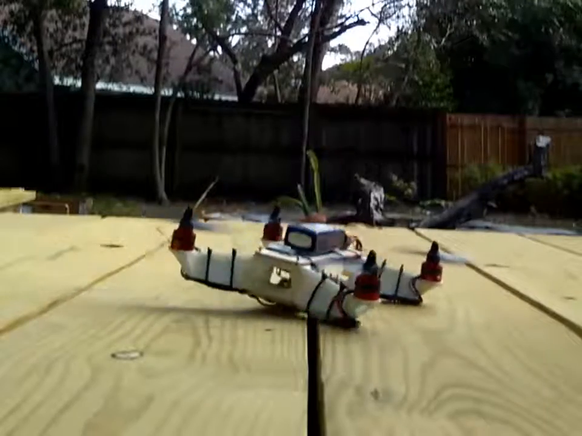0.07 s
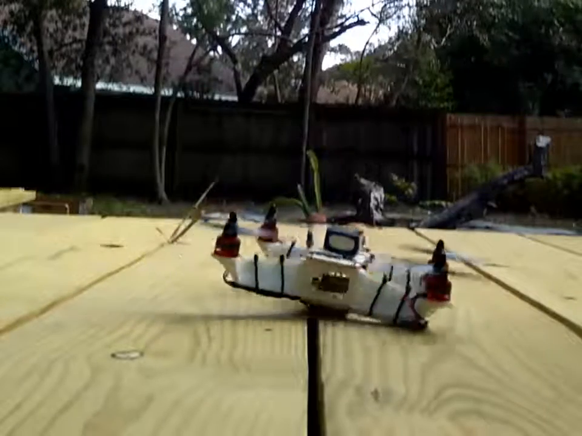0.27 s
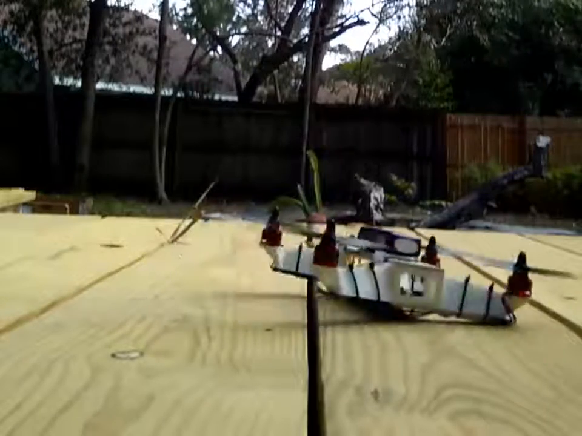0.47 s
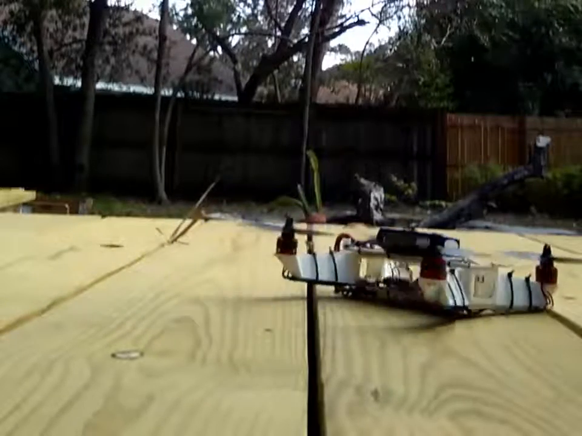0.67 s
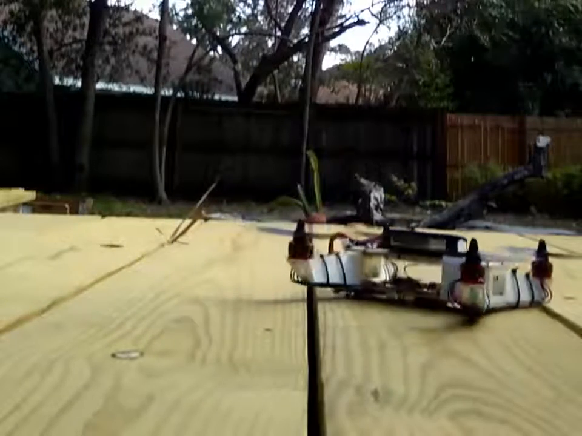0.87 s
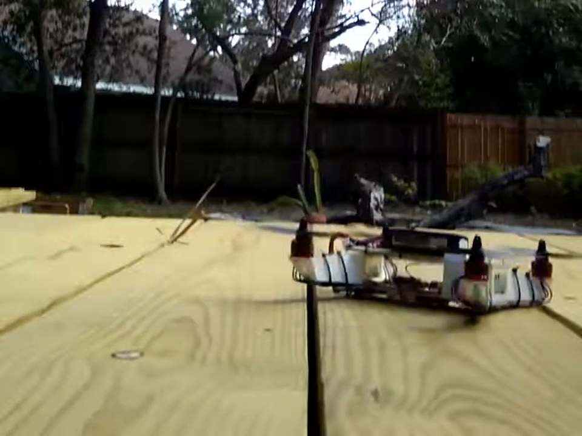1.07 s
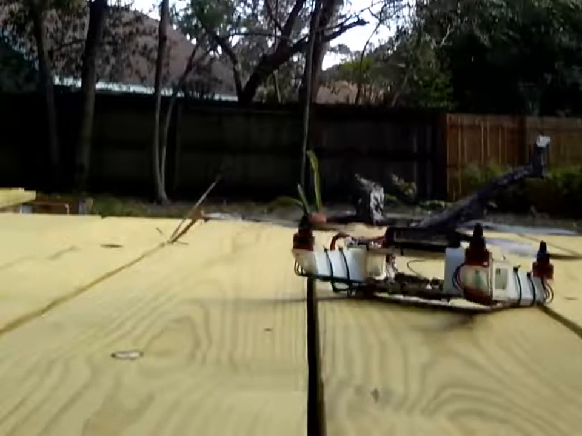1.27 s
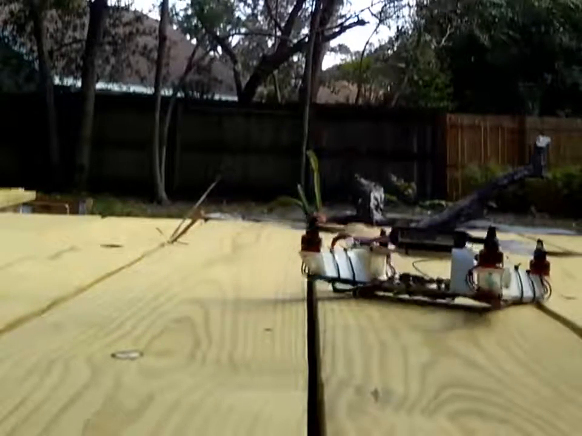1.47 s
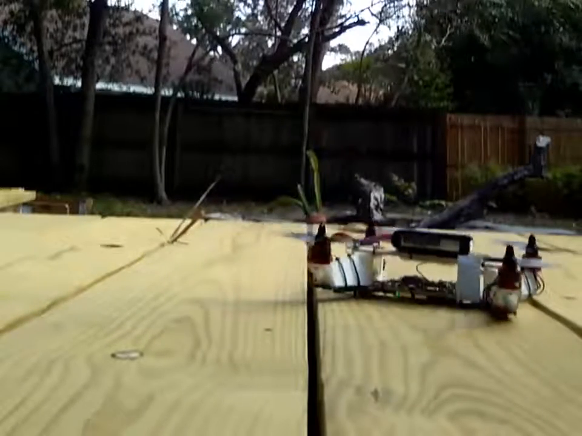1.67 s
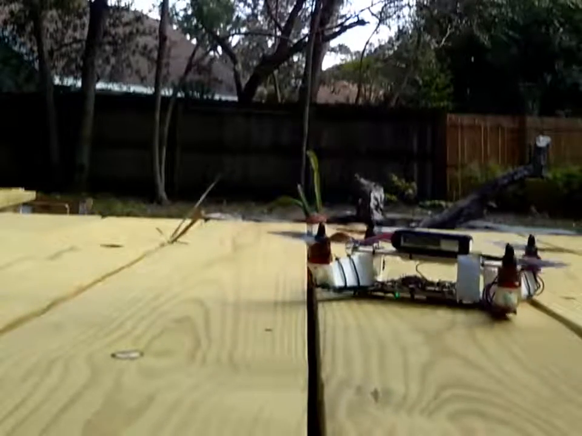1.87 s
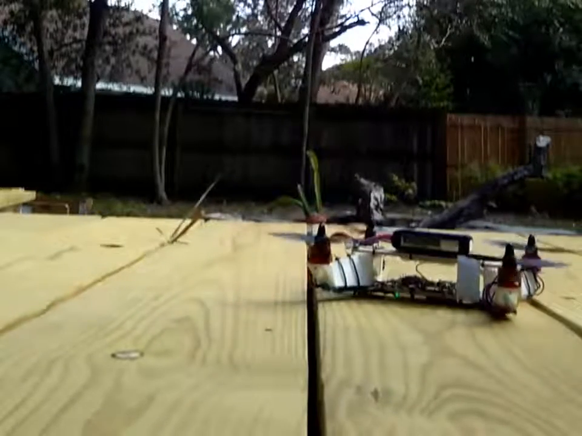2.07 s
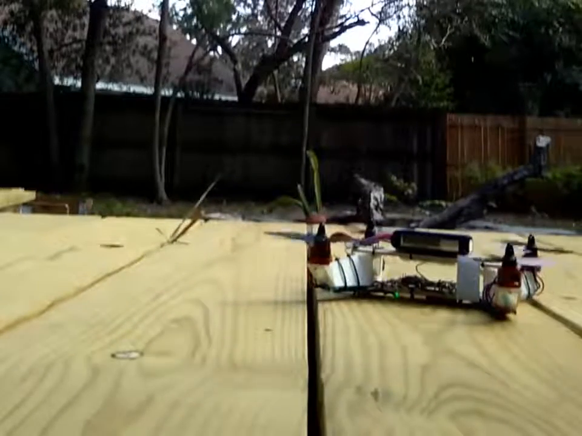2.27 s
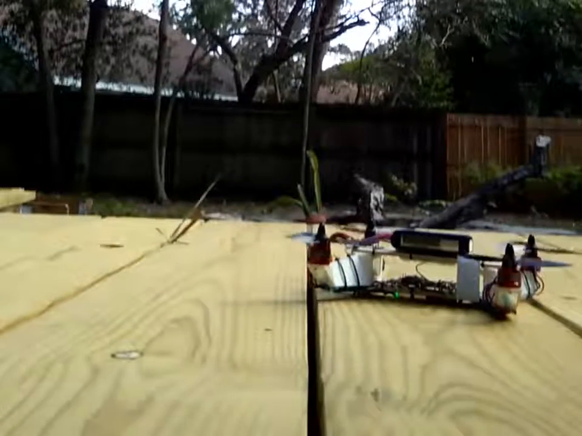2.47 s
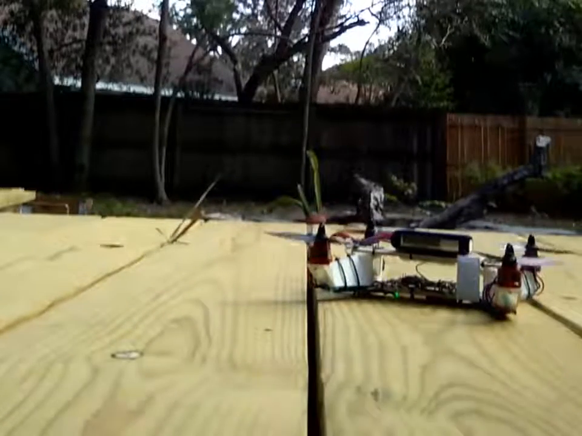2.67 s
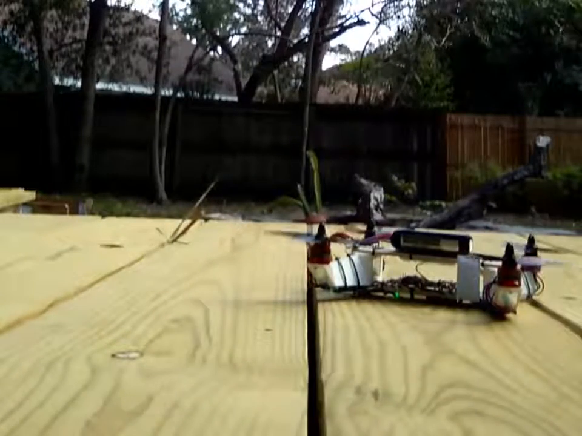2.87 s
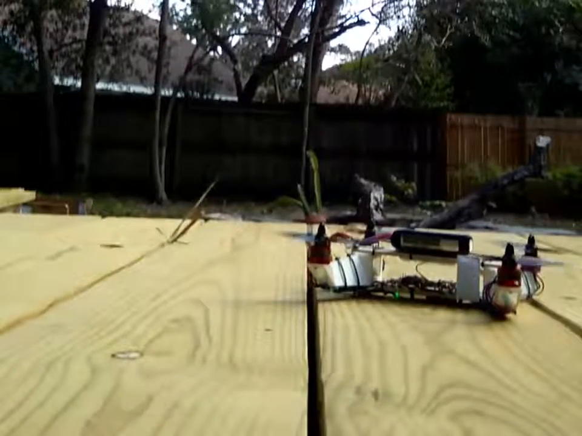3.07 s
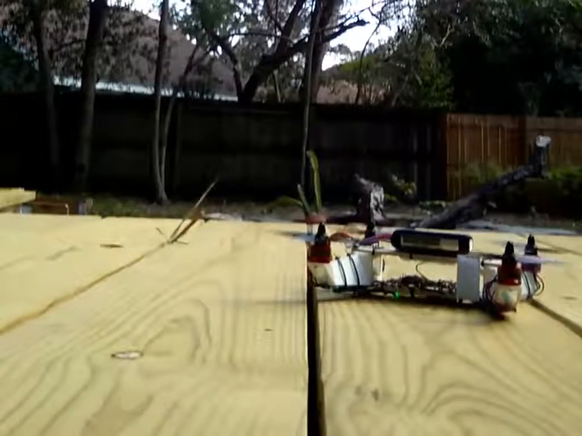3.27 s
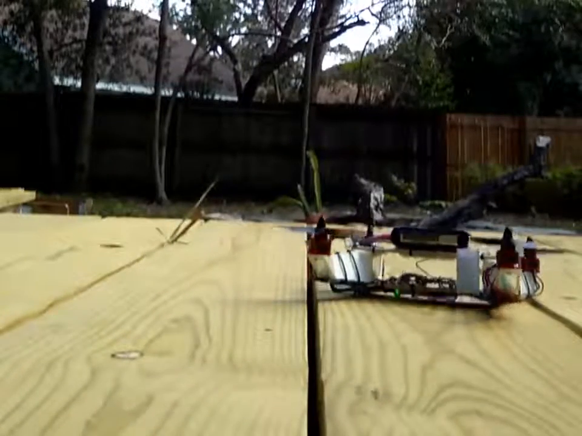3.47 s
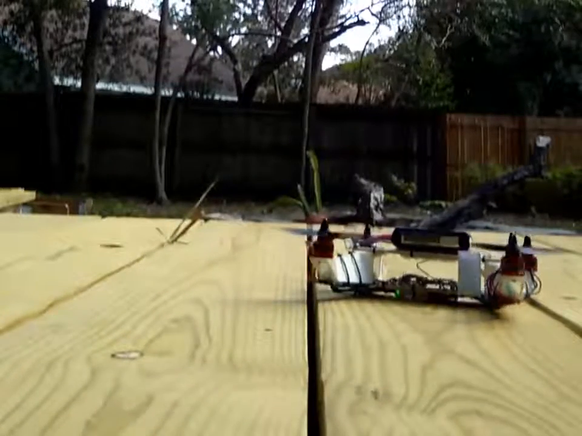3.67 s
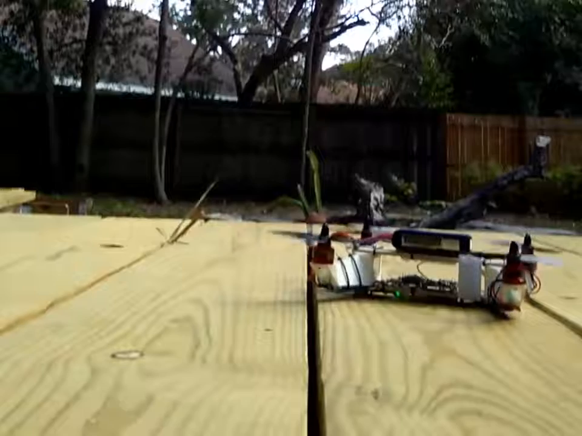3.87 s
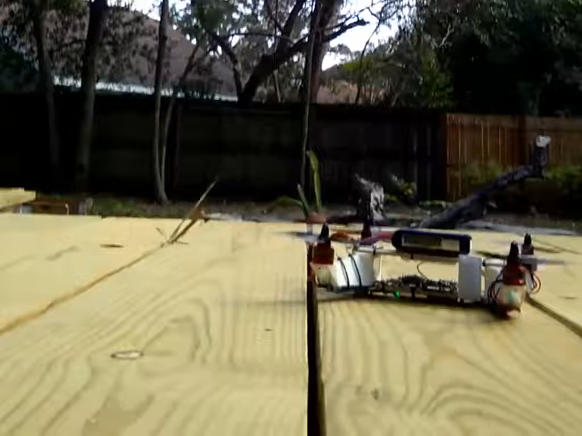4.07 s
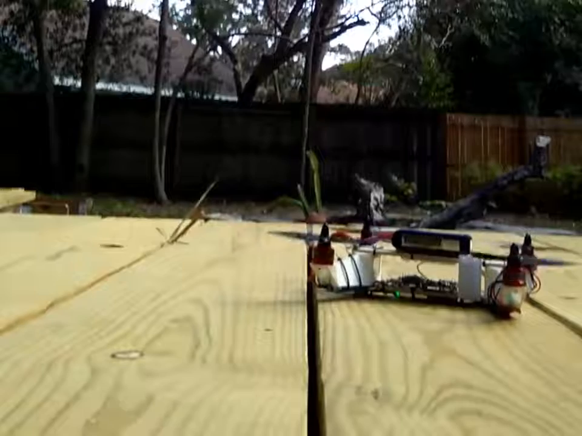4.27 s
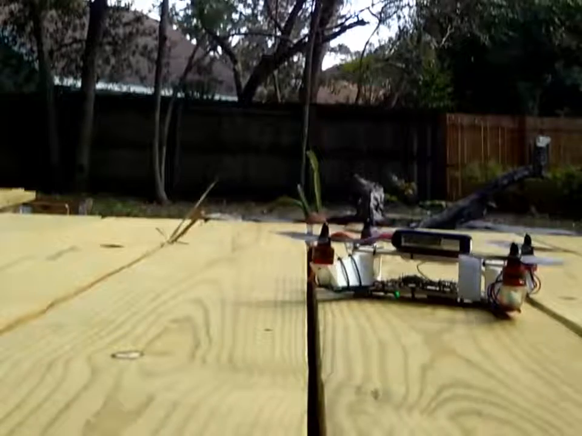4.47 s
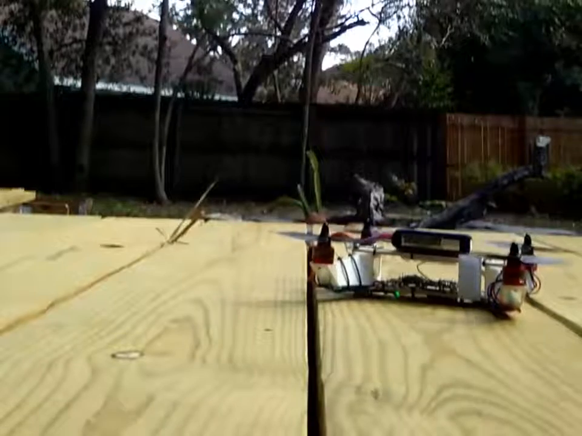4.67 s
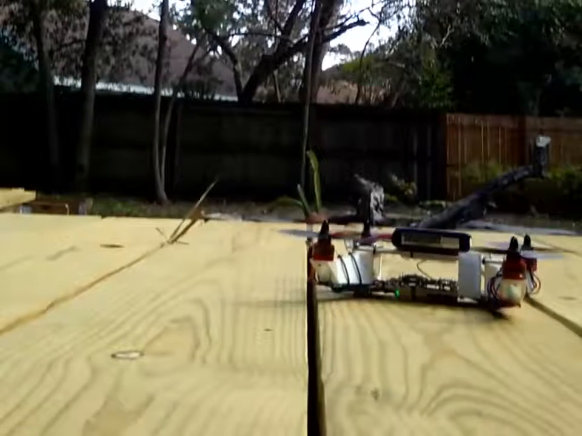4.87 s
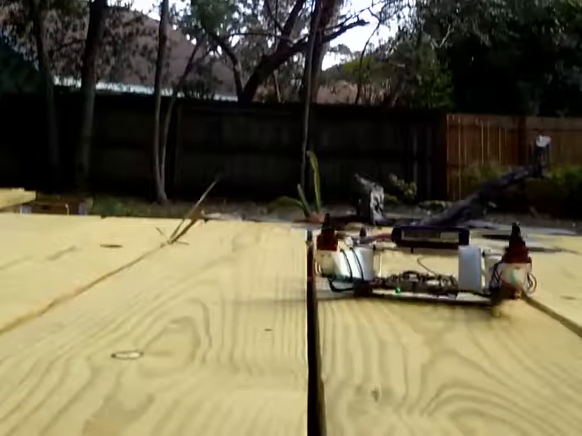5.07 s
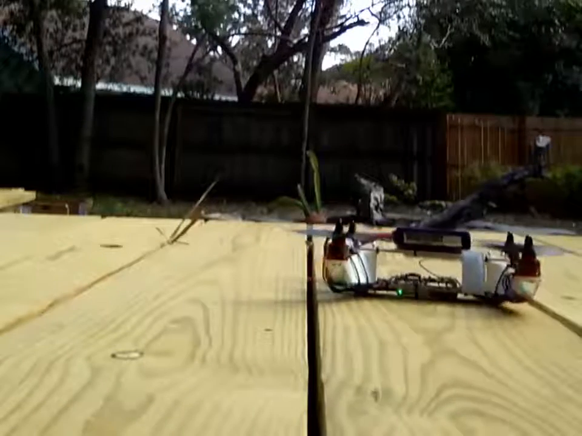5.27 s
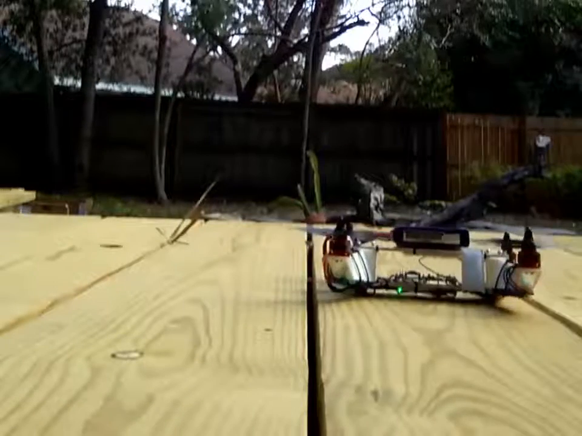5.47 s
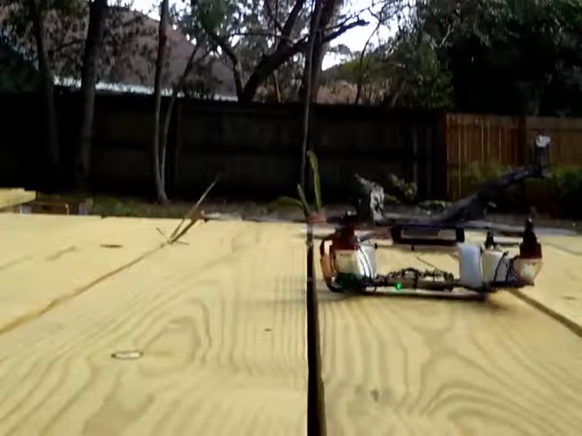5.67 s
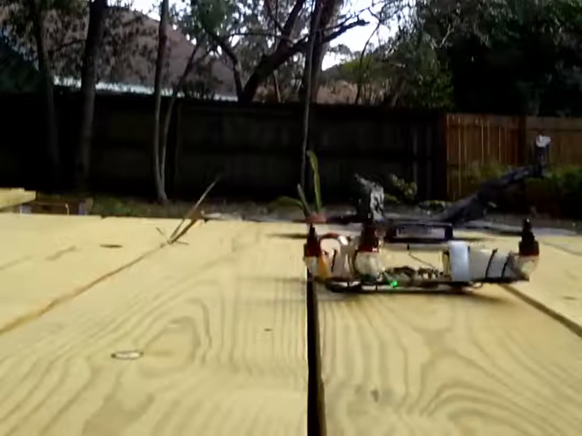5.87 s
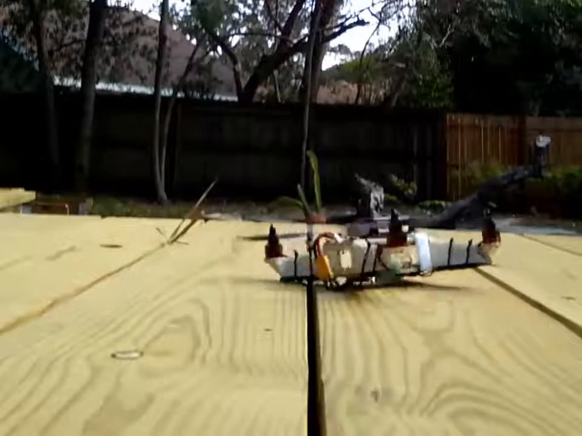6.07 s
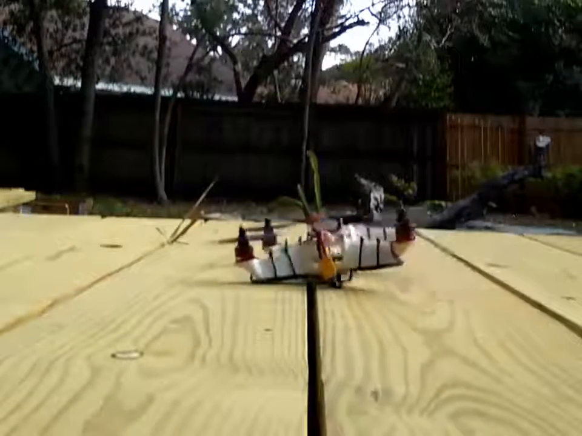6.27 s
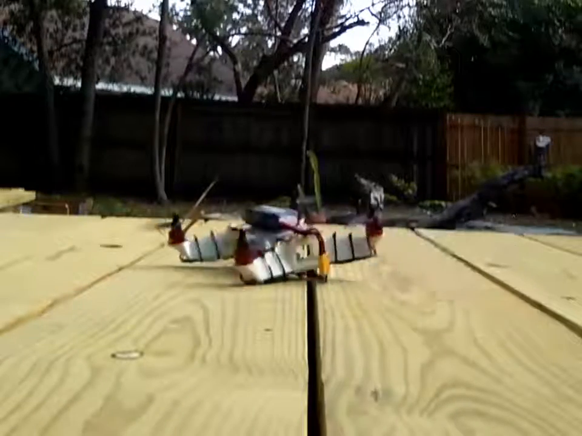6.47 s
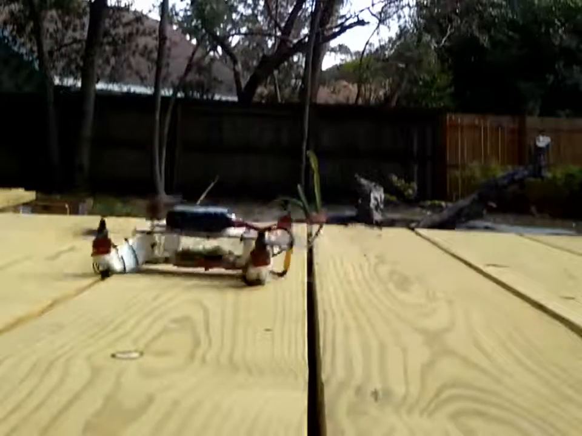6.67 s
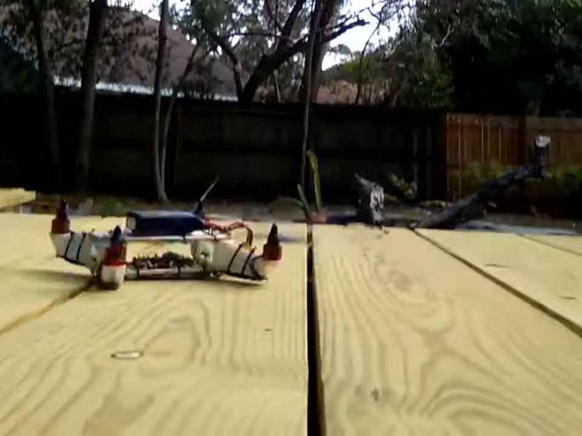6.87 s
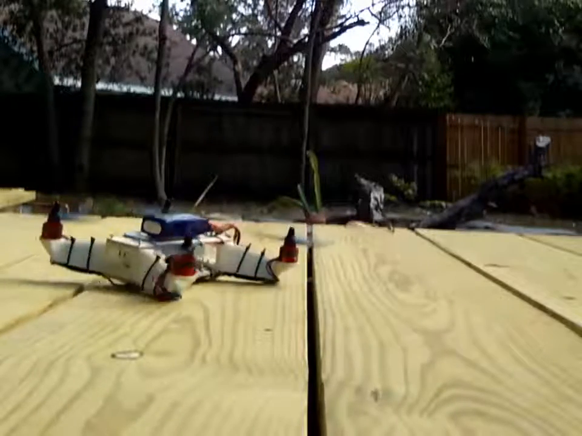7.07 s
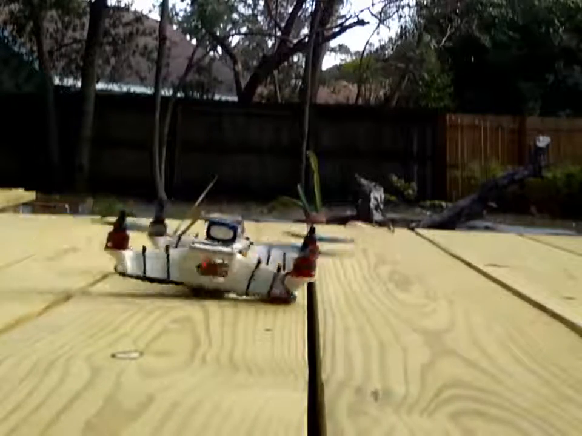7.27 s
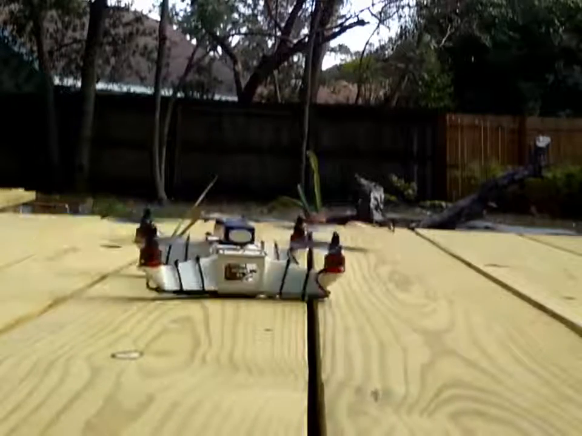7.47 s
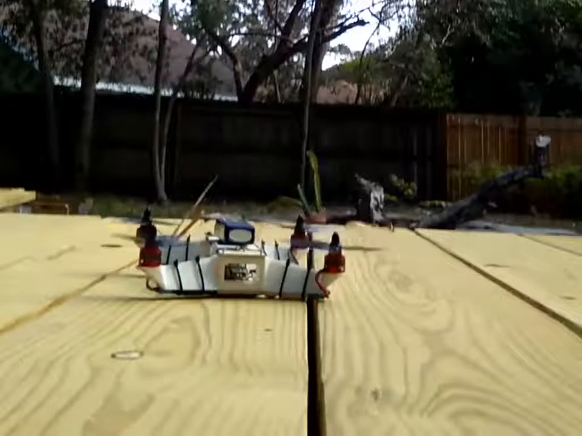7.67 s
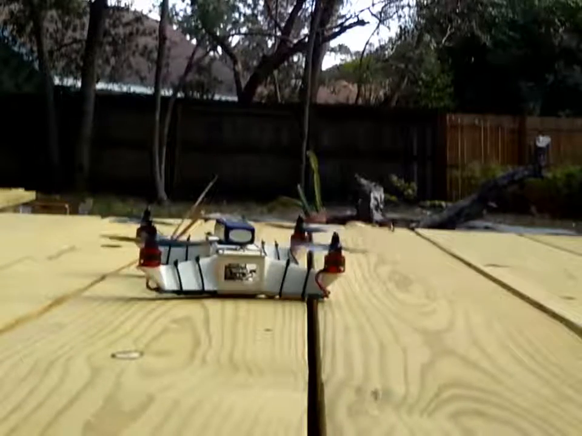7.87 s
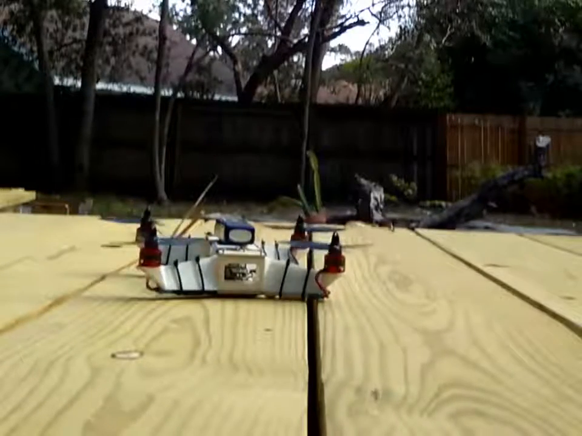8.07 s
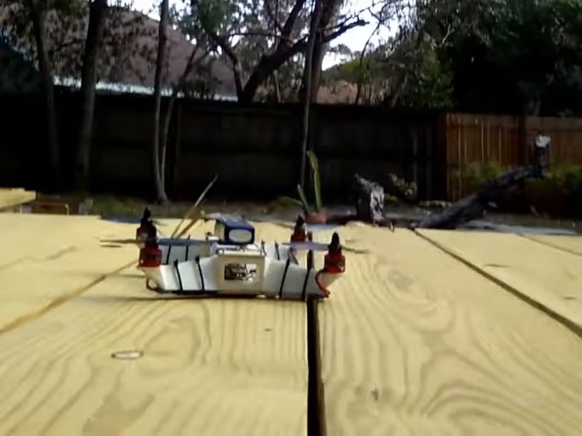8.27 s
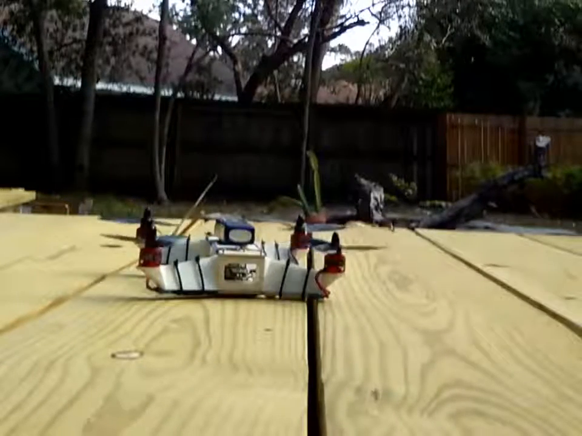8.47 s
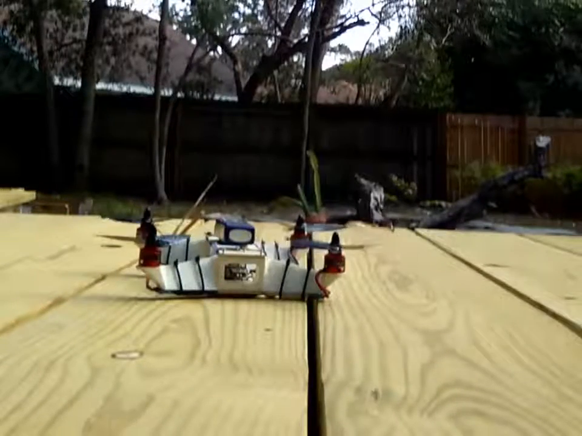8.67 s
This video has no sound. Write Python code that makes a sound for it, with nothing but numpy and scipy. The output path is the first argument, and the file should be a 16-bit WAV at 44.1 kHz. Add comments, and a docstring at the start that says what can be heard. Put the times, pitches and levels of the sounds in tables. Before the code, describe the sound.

Four small propellers give a rough, beating hum with bright airy hiss and thin motor whine. They run down, leaving a far-off engine and faint dry scuffs, then squeal sharply into a brief rev. After another slowdown the longest burst rises in pitch; downwash buffets the nearby microphone hard and briefly dulls its level. Finally the motors whistle down, with small low wind bumps in the garden.

```python
"""Four three-blade propellers hum and hiss close to a stereo camera: a small homemade quadcopter skids on a deck.
It has three bursts of throttle. Blade-pass tones and pulsing noise make the propellers; pole and switching tones
make the motors, which whine under power, whistle as they run down and squeal on starting from rest.
Downwash buffets the microphone with damped low swings and rumble, once so hard that the camera's gain ducks.
Behind the quiet noise of the garden an engine goes by far off, and a second, steadier drone swells later."""
import sys
import numpy as np
from scipy import signal
from scipy.fft import rfft, irfft
from scipy.io import wavfile
from scipy.ndimage import uniform_filter1d

SR = 44100
rng = np.random.default_rng(int(sys.argv[2]) if len(sys.argv) > 2 else 0)


def master_out(mix):
    """Clip the mix to full scale and print it as 16-bit PCM to the path in sys.argv[1]."""
    frames = np.transpose(np.atleast_2d(mix))
    ceiling = np.clip(frames, -1, 1)
    pcm = np.round(ceiling * 32767).astype(np.int16)
    wavfile.write(sys.argv[1], SR, pcm)


N = 384534
TIME = np.arange(N) / SR
FREQ = np.maximum(np.fft.rfftfreq(N, 1 / SR), 1)
PWM_HZ = 8020  # half the rate of the whine's switching lines, and the carrier of the squeal
POLES_PER_BLADE = 14 / 3  # motor poles per blade pass
CATCH_S = 2.907  # the motors catch
# bursts of throttle, powered from first point to last: t/s, reference blade-pass f/Hz, spread of rotor speeds/%
THROTTLE = [
    [(0, 394.3, 5.4), (.5, 396.3, 5.4), (.62, 354.3, 5.5), (.78, 326.7, 6.5), (1, 344.6, 7),
     (1.3, 367.5, 7), (1.45, 368.2, 7.3), (1.61, 332.2, 7)],
    [(2.715, 3, 5), (2.89, 160, 6), (2.95, 212, 7), (3.17, 222, 7), (3.36, 353, 7), (3.48, 357, 7.6),
     (3.63, 338, 7.5)],
    [(4.27, 64.8, 7), (4.45, 185.3, 7), (4.72, 264, 7), (4.9, 351, 7.6), (5.04, 371.2, 7.4), (5.27, 335, 6),
     (5.5, 379, 6.5), (5.68, 394.7, 6.6), (6.05, 399, 5.8), (6.3, 411.6, 6.6), (6.55, 419, 7.2),
     (6.85, 405.2, 6), (7.25, 403.8, 5.2)],
]
# the four rotors: offset from the reference speed/spreads, level of its hum/dB
ROTORS = [(-2, -15.5), (-1, 2), (-.25, 3), (1, 2)]


def undb(db):
    """Decibels to gain."""
    return 10 ** (np.asarray(db) / 20)


def curve(rows, axis=1):
    """One column of a table at every sample."""
    rows = np.asarray(rows, float)
    return np.interp(TIME, rows[:, 0], rows[:, axis])


def response(points):
    """Gain at every frequency from f/Hz, level/dB points."""
    hz, db = np.transpose(points)
    return undb(np.interp(np.log(FREQ), np.log(hz), db))


def colour(x, gain):
    """Filter by a gain at every frequency."""
    return irfft(rfft(x) * gain, N)


def unit(x):
    """Scale to rms 1."""
    return x / np.sqrt(np.mean(x ** 2))


def noise():
    """Two unrelated white noises, one a channel."""
    return rng.standard_normal((2, N))


def walk(rate):
    """Random levels held 1 / rate s and slewed twice; spread near 1."""
    hold = max(int(SR / rate), 2)
    levels = np.random.default_rng(rng.integers(2 ** 31)).standard_normal(N // hold + 2)
    held = np.repeat(levels, hold)
    return 1.3 * uniform_filter1d(uniform_filter1d(held, hold), hold)[:N]


def tone(turns):
    """A sine that reaches the two channels in unrelated phases."""
    angle = (2 * np.pi * (turns % 1)).astype(np.float32)
    phase = rng.uniform(0, 2 * np.pi, (2, 1)).astype(np.float32)
    return np.sqrt(2) * np.sin(angle + phase)


def since(s):
    """Seconds gone by since a moment; 0 before it."""
    return np.maximum(TIME - s, 0)


def lag(x, seconds):
    """Follow a control with a time constant."""
    keep = np.exp(-1 / (seconds * SR))
    return signal.lfilter([1 - keep], [1, -keep], x)


def swells(rows):
    """Gain of events that each rise to a peak and fall away again."""
    return sum(undb(db) * np.exp(-np.abs(TIME - s) / width) for s, db, width in rows)


def rotor_speed():
    """The rotors follow the throttle, then coast down against air drag and bearing friction until the next burst."""
    drag_per_pass, friction_hz_per_s = .0135, 55  # share of speed lost per blade pass; loss in the bearings
    hz = np.zeros(N)
    knee_hz = np.sqrt(friction_hz_per_s / drag_per_pass)  # where drag and friction are equal
    for burst in THROTTLE:
        start = burst[0][0]
        stop, last_hz, _ = burst[-1]
        angle = np.arctan(last_hz / knee_hz) - drag_per_pass * knee_hz * since(stop)
        coast = knee_hz * np.tan(np.maximum(angle, 0))
        powered = np.where(TIME < stop, curve(burst), coast)
        hz = np.where(TIME < start, hz, powered)
    return hz


def rotors(hz, wander=.004, flutter=0.00289):
    """Blade passes counted for each rotor; the flight controller spreads the speeds and keeps nudging each."""
    spread = curve([row for burst in THROTTLE for row in burst], axis=2) / 100
    passes = []
    for offset, _ in ROTORS:
        nudged = 1 + wander * walk(6) + flutter * walk(45)
        passes.append(np.cumsum(hz * (1 + offset * spread) * nudged) / SR)
    return passes


def blade_hum(passes, speed, slope_db=-4.5, patchy_db=4.5, imbalance_db=-19, jitter=0.17, throb_db=2.0,
              smear=0.019):
    """Each passing blade pushes the air; unequal blades add weak lines at multiples of the shaft rate."""
    # colour from the deck below: f/Hz, level/dB
    deck = [(60, -14), (200, 0), (280, 0.5), (340, -7), (392, -1.25), (430, -0.5), (540, -4.5), (660, 4),
            (745, -7), (830, -2.5), (950, -2), (1070, 0.5), (1220, -2), (1330, 3), (1550, -1.5), (1710, 2),
            (2100, 0.5), (2500, -1), (4000, -54)]
    hum = 0
    for p, (_, db) in zip(passes, ROTORS):
        # overtones come and go as the blades cut through eddies, and smear at part throttle
        shaken = p + (smear + jitter * (1.05 - speed)) * walk(70)
        overtones = sum(undb(slope_db * np.log2(k) + patchy_db * walk(36)) * tone(k * shaken)
                        for k in range(2, 9))
        shaft = sum(tone(k * p / 3) for k in (2, 10, 11, 13, 14))
        fundamental = undb(throb_db * walk(14)) * tone(p)
        hum = hum + undb(db) * (fundamental + overtones + undb(imbalance_db) * shaft)
    return colour(hum / 2, response(deck))


def mounts():
    """Gain of the motor mounts at every frequency, the power sum of their resonances."""
    # resonances: f/Hz, width/Hz, level/dB
    resonances = [(3437, 60, -7), (3600, 20, -3.5), (3940, 17, -6.5), (4236, 74, -2.5), (4520, 130, -4)]
    return np.sqrt(sum(undb(db) ** 2 / (1 + (2 * (FREQ - hz) / width) ** 2) for hz, width, db in resonances))


def air_noise(passes, spectrum, chop=.6, throb=0.14, flicker_db=1, echo_db=-13, ripple_hz=190, ring=0):
    """Turbulence shed by the blades pulses once per pass and throbs as two rotors drift in and out of step."""
    chopping = chop * sum(np.cos(2 * np.pi * p) for p in passes) / len(passes)
    beating = throb * np.cos(2 * np.pi * (passes[3] - passes[2]))
    pulsing = 1 + chopping + beating
    # a short echo, duller than the sound itself, and the mounts ripple the spectrum
    echo = 1 + undb(echo_db) * np.exp(-2j * np.pi * FREQ / ripple_hz) / (1 + (FREQ / 4500) ** 2)
    gain = response(spectrum) * echo * (1 + ring * mounts())
    return unit(colour(noise() * pulsing, gain)) * undb(flicker_db * walk(22))


def motor_current():
    """Current builds up with each burst and dies when the throttle closes."""
    attack_s, release_s = 0.25, 0.0073
    current = 0
    for burst in THROTTLE:
        rise = 1 - np.exp(-since(burst[0][0]) / attack_s)
        current = current + rise * np.exp(-since(burst[-1][0]) / release_s)
    return current


def motor_whine(passes, speed, pull_db=-44.0, rasp_db=-41, switch_db=-63, judder=0.034):
    """Poles pull unevenly on the motor bells, commutation rasps most at low speed, switching adds high sidebands."""
    # how the bells radiate the pull of the poles: f/Hz, level/dB
    pole_band = [(2800, -26), (3600, -32), (4200, -10), (5200, -24), (6400, -20), (6850, -7), (7120, 5.5),
                 (7480, 5), (7750, -4), (8100, -28)]
    # band in which the motors rasp: f/Hz, level/dB
    rasp_band = [(2800, -26), (3700, -3.5), (5000, -23), (6600, -15), (7080, -5), (7600, -1), (7950, -21),
                 (9000, -23.5)]
    pull, switching = 0, 0
    for p in passes:
        poles = POLES_PER_BLADE * p
        # the bells judder on their bearings, which blurs the pole tones
        shaken = poles + judder * walk(160)
        pull = pull + sum(tone(k * shaken) * undb(2 * walk(8) + 3.8 * walk(45)) for k in (2, 4))
        pair = tone(2 * PWM_HZ * TIME - poles) + 0.58 * tone(2 * PWM_HZ * TIME - 3 / 2 * poles)
        switching = switching + pair * undb(2.4 * walk(40))
    # the pole tones grow with speed
    pull = colour(pull, response(pole_band)) * speed ** 3
    rasp = unit(colour(noise(), response(rasp_band))) * undb(2 * walk(39.75)) * (1.5 - speed)
    return (undb(pull_db) * pull + undb(rasp_db) * rasp + undb(switch_db) * switching) * motor_current()


def bearing_whine(passes, speed, db=-37, flicker_db=3, rattle=0.023):
    """Bearings sing and rattle on high shaft multiples, flaring as each tone crosses a resonance of the mounts."""
    # tones: rotor index, multiple of its shaft rate
    bearing_tones = [(2, 26), (3, 26), (3, 28), (3, 29), (3, 30), (3, 33)]
    lines = 0
    for rotor, k in bearing_tones:
        line = tone(k * passes[rotor] / 3 + rattle * walk(150))
        lines = lines + line * undb(flicker_db * walk(18))
    return undb(db) * colour(lines, mounts()) * speed ** 2


def garden_quiet():
    """The quiet of the garden is coloured noise whose level drifts slowly."""
    # spectrum: f/Hz, level/dB
    spectrum = [(30, 14.5), (85, 9.5), (160, -8.5), (230, -1.5), (290, -7.5), (400, -0.5), (900, 3),
                (1500, -1.5), (2500, -8), (3700, -12.5), (5800, -13), (7500, -19.5), (11000, -25),
                (15500, -27)]
    bed = undb(-44.0) * unit(colour(noise(), response(spectrum)))
    return bed * undb(.6 * walk(1.9))


def buffets(crack_db=-19, far_port_db=-1, port_lag_s=0.00048, low_cut_hz=18):
    """Eddies slap the microphone: a heavily damped low swing with a dull puff, on top of gusty rumble."""
    # eddies: t/s, level before the onset and decay/dB, f/Hz, decay/s
    eddies = [(.47, -16, 45, 0.018), (.6, -28, 49, .015), (1.081, -29, 54.84, .018),
              (1.248, -32, 60.4, .015), (1.86, -28, 60, 0.017), (3.99, -29, 45.6, 0.018),
              (6.008, -9, 27.97, 0.027), (6.07, -6, 45, .012), (6.0817, -5.5, 280, 0.0068),
              (6.088, -12.5, 418, 0.016), (6.095, -1, 127, 0.0056), (6.1023, 3.5, 343, 0.0042),
              (6.1035, -5, 1080, 0.0019), (6.1128, -2, 298, 0.0044), (6.146, -6, 90, .018),
              (6.304, -7, 50.1, 0.015), (6.528, -14, 44.55, 0.013), (7.455, -20, 65, .01),
              (7.536, -20, 45, 0.021), (7.81, -25, 60, 0.0096), (7.97, -25, 45.4, 0.02),
              (8.119, -21, 85, 0.011), (8.155, -17, 24, 0.025)]
    # gusts over the light breeze: t/s, level at the peak/dB, rise and fall/s
    gusts = [(.65, -43, 0.26), (1.3, -51, .4), (6.09, -22.5, 0.052), (6.45, -18.5, 0.18), (7.1, -37, .16),
             (7.6, -44, .1), (8.22, -49, .08)]
    breeze_db = -54
    puff = unit(colour(noise(), response([(100, 14), (1100, 5), (1600, -28), (4000, -42)])))[0]
    slaps = 0
    for s, db, hz, decay in eddies:
        age = since(s)
        envelope = np.exp(-age / decay) * (1 - np.exp(-age / 0.0012))
        # higher eddies carry more of the puff
        swing = -np.sin(2 * np.pi * hz * age) + undb(crack_db) * (hz / 370) ** 2 * puff
        slaps = slaps + undb(db) * envelope * swing
    rumble_band = [(10, -1), (25, 5), (60, 2), (110, -3), (220, -13), (500, -32), (2000, -80)]
    rumble = unit(colour(noise(), response(rumble_band)))[0]
    gusty = rumble * (undb(breeze_db) + swells(gusts)) * undb(0.92 * walk(14))
    wind = colour(slaps, 1 / (1 + low_cut_hz / (1j * FREQ))) + gusty
    # the right channel gets the same push inverted and a little later
    later = colour(wind, np.exp(-2j * np.pi * FREQ * port_lag_s))
    return np.array([wind, -undb(far_port_db) * later])


def far_engine(side_db=-4, waver=0.00843, throb_db=1.64):
    """A distant engine goes by: it swells, sinks a little in pitch and fades, each of its low lines wavering."""
    # lines: f/Hz, level within the engine/dB, loudest at t/s, rise/s, fall/s
    engine_lines = [(54, -52, 1.2, 1, .96), (87.2, -41, 1.68, .85, 0.42), (104, -47.5, 1.97, 0.22, 0.23),
                    (121.7, -40, 2.1, 0.36, 0.18), (174, -37, 2.39, 0.72, 0.18),
                    (234, -54.5, 2.02, .95, 0.88), (285.7, -49, 1.79, 0.52, 1)]
    nearest_s, near_s, level_db = 1.95, 0.66, -0.85  # when nearest, how long it stays near, overall gain
    speed_m_s, sound_m_s, falloff = 3.49, 343, 1.055
    along = (TIME - nearest_s) / near_s
    distance = np.hypot(1, along)  # 1 at its nearest
    doppler = 1 - speed_m_s / sound_m_s * along / distance
    lines = 0
    for hz, db, s, rise, fall in engine_lines:
        passing = np.hypot(1, (TIME - s) / np.where(TIME < s, rise, fall)) ** -falloff
        level = undb(db + throb_db * walk(11)) * passing
        lines = lines + level * tone(np.cumsum(hz * doppler * (1 + waver * walk(12))) / SR)
    roar_band = [(50, -37), (100, 4.0), (290, 4.5), (400, 2.0), (800, -2.0), (1500, -23.0), (4000, -39)]
    roar = unit(colour(noise(), response(roar_band)))
    lines = lines + undb(-40.5) * distance ** -falloff * roar
    mid, side = lines * undb(level_db)
    return mid + undb(side_db) * side * np.array([[1], [-1]])


def coasting(passes, patchy_db=5.5):
    """With the power off, cogging tones slide down through the frame's resonances, swell briefly and fade."""
    # cogging tones: rotor index, multiple of its shaft rate
    cogging_tones = [(1, 28), (0, 35), (2, 42)]
    # one relative level for each cogging tone: level/dB
    cogging_db = [-3.5, -6.5, -4.5]
    # how the frame radiates the cogging: f/Hz, level/dB
    frame = [(600, -38), (950, -7), (1150, -6), (1300, 4.5), (1420, -2), (1750, -9), (2000, -4), (2200, -8),
             (2600, -24)]
    # gain of the whistle at its loudest after each burst: level/dB
    run_down_db = [-57, -58, -44.5]
    run_down_s = .38  # from closing the throttle to the peak of the envelope
    cogging = 0
    for (rotor, k), db in zip(cogging_tones, cogging_db):
        cogging = cogging + tone(k * passes[rotor] / 3) * undb(db + patchy_db * walk(25))
    envelope = 0
    for burst, db in zip(THROTTLE, run_down_db):
        age = since(burst[-1][0]) / run_down_s
        envelope = envelope + undb(db) * (age * np.exp(1 - age)) ** 2
    return colour(cogging, response(frame)) * envelope


def scuffs(grain_db=3):
    """Faint dry scuffs while the frame rests on the boards: grainy noise in short swells."""
    # scuffs: t/s, level before the grain/dB, rise and fall/s
    scuff_times = [(2.2, -58, .008), (2.485, -58, .012), (2.515, -60, .012)]
    dry_band = [(1500, -20), (3500, -3), (7000, 0), (10000, -1), (15000, -18)]
    scrape = unit(colour(noise(), response(dry_band)))
    return scrape * swells(scuff_times) * undb(grain_db * walk(250))


def start_surge():
    """Gain of the squeal: on at once, growing, held until the motors catch, then a fast release and faint ring."""
    start_s, rise_s, release_s, ring_s = 2.7, 0.12, 0.0067, 0.07
    held_db, growth_db, ring_db = -24, 19.5, -10
    growing = undb(held_db - growth_db * np.maximum(1 - since(start_s) / rise_s, 0))
    age = since(CATCH_S)
    release = np.maximum(np.exp(-age / release_s), undb(ring_db) * np.exp(-age / ring_s))
    return (TIME > start_s) * growing * release


def start_squeal(passes, carrier_db=-8, rough_db=3.5, stumble=0.16, rasp_db=-9, catch_db=-43):
    """The switching tone splits as the rotors pick up; its lower sideband sweeps into the ring of the bells."""
    # ring of the motor bells: f/Hz, level/dB
    bell = [(900, -62), (3000, -26), (3600, -36), (4200, -12), (5200, -10), (6500, -6), (6900, -14),
            (7130, -3.5), (7400, 1.5), (7700, 0), (8200, -10), (9000, -34), (15000, -12)]
    sidebands = 0
    for p in passes:
        poles = POLES_PER_BLADE * p + stumble * walk(300)
        pair = tone(PWM_HZ * TIME - poles) + tone(PWM_HZ * TIME + poles)
        pair = pair + tone(PWM_HZ * TIME + 3 * poles) / 4
        sidebands = sidebands + pair * undb(rough_db * walk(470))
    rasp_band = [(5500, -19.5), (6700, -15), (7350, 4.0), (7700, -7), (8300, -11), (12000, -34)]
    rasp = unit(colour(noise(), response(rasp_band)))
    carrier = undb(carrier_db) * tone(PWM_HZ * TIME)
    squeal = colour(sidebands / 2, response(bell)) + carrier + undb(rasp_db) * rasp
    # a short bright spit as the motors catch
    spit = unit(colour(noise(), response([(7000, -28), (9000, 2), (15000, -16)])))
    spit = spit * np.exp(-np.abs(TIME - CATCH_S) / 0.054)
    return squeal * start_surge() + undb(catch_db) * spit


def catch_chirp(start_hz=8800, sweep_s=0.023, lead_s=0.013, db=-45, rough_db=3, scatter=0.059):
    """As the motors catch, a ragged whistle shoots up through the treble and fades."""
    progress = since(CATCH_S - lead_s) / sweep_s
    hz = start_hz * 2 ** np.minimum(progress, 1) * (1 + scatter * walk(1500))
    hz = np.minimum(hz, SR * .45)
    envelope = 2 * progress * np.exp(1 - 2 * progress) * (progress < 1)
    return undb(db + rough_db * walk(500)) * envelope * tone(np.cumsum(hz) / SR)


def far_drone(hz=160, waver=0.0078):
    """One low wavering note swells in the distance."""
    # swells: t/s, level before the slow throb/dB, rise and fall/s
    drone_swells = [(3.2, -75, 0.26), (5.05, -45.5, 0.36), (7.5, -48, 0.33)]
    note = tone(np.cumsum(hz * (1 + waver * walk(18))) / SR)
    return note * swells(drone_swells) * undb(2 * walk(13))


def stereo_pair(x):
    """Share the sound between mid and side, band by band, at constant power."""
    # the pair sets side against mid in alternating bands: f/Hz, side minus mid level/dB
    width = [(40, 4.5), (130, -12), (260, -8.5), (400, -16), (950, -15), (1310, -28.5), (1650, -14.5),
             (2000, -2), (2480, 11), (2590, 19.5), (2720, 23.5), (2830, 9.5), (3200, 2.5), (3900, -13),
             (4500, 2), (5300, 9), (6200, -2), (7000, -2.5), (8200, 4), (9600, -3), (11000, 2)]
    ratio = response(width)
    shares = np.array([np.ones_like(ratio), ratio]) / np.sqrt(1 + ratio ** 2)
    mid, side = colour(x, shares)
    return np.array([mid + side, mid - side])


def gain_control(x):
    """A loud peak pushes the gain down by its excess over the threshold; the gain then creeps back."""
    duck_above_db, attack_s, recover_db_per_s = -7.5, 0.008, 4.5
    peak_db = 20 * np.log10(np.abs(x).max(axis=0) + 1e-9)
    excess_db = np.maximum(peak_db - duck_above_db, 0)
    recovery_db = recover_db_per_s * TIME
    held_db = np.maximum.accumulate(excess_db + recovery_db) - recovery_db
    return x * undb(-lag(held_db, attack_s))


def scene():
    """The quadcopter close by, the garden, the distant engines and the wind on the microphone."""
    # lower and upper spectrum of the air noise, each: f/Hz, level/dB
    rush = [(40, -6), (130, -4.5), (280, -6), (400, -3), (540, -8.5), (680, -4.5), (950, -4), (1130, 0.5),
            (1650, -2), (2200, -2.5), (3000, -0.5), (5000, -53)]
    hiss = [(1200, -48), (2200, -23), (2800, -12.5), (3300, 0.5), (5000, 1.1), (6400, -1.5), (7600, -4),
            (8600, -7.5), (11000, -12.5), (12800, -19), (15500, -23.5)]
    wake_s = 0.019  # the stirred air dies down a little after the rotors slow
    hz = rotor_speed()
    passes = rotors(hz)
    speed = hz / hz.max()
    wake = np.maximum(speed, lag(speed, wake_s))
    # blade noise grows steeply with tip speed
    propellers = undb(-32.5) * speed ** 3.53 * blade_hum(passes, speed)
    propellers = propellers + undb(-29.0) * wake ** 2.08 * air_noise(passes, rush, chop=0.62)
    hissing = air_noise(passes, hiss, chop=0.24, throb=0.045, ring=0.13)
    propellers = propellers + undb(-29.0) * wake ** 2.57 * hissing
    motors = motor_whine(passes, speed) + bearing_whine(passes, speed) + coasting(passes)
    motors = motors + start_squeal(passes) + catch_chirp()
    paired = stereo_pair(propellers + motors + garden_quiet() + scuffs() + far_drone())
    return paired + buffets() + far_engine()


def record(dry):
    """The camera clips at full scale, ducks after the overload and cuts the top."""
    top_hz = 15500
    top_cut = signal.ellip(10, .1, 80, top_hz, fs=SR, output="sos")
    return signal.sosfilt(top_cut, gain_control(np.clip(dry, -1, 1)))


dry = scene()
out = record(dry)
master_out(out)
```